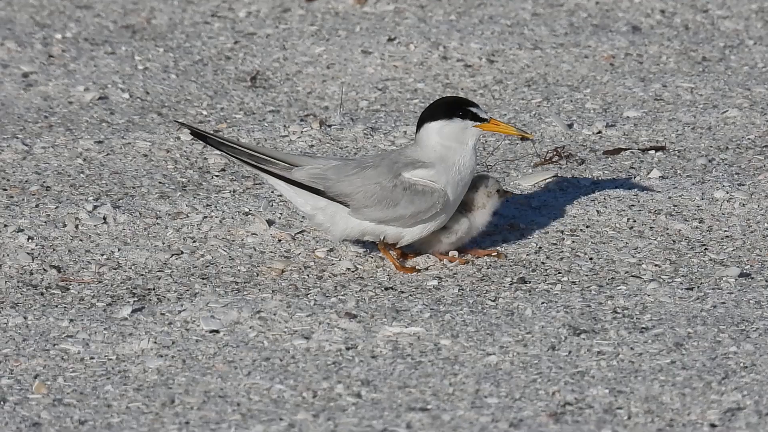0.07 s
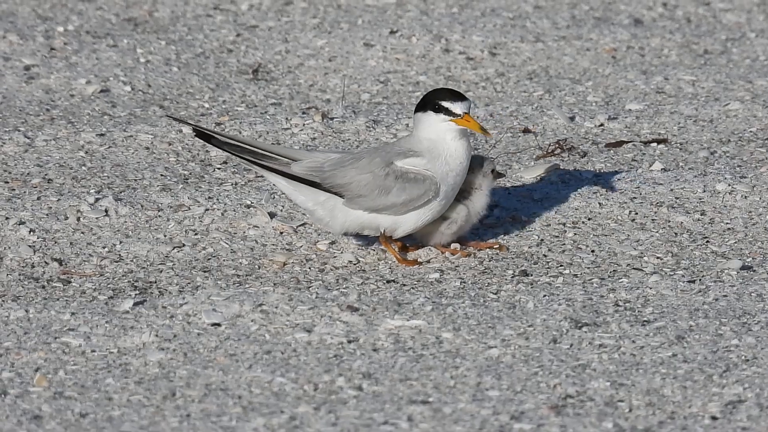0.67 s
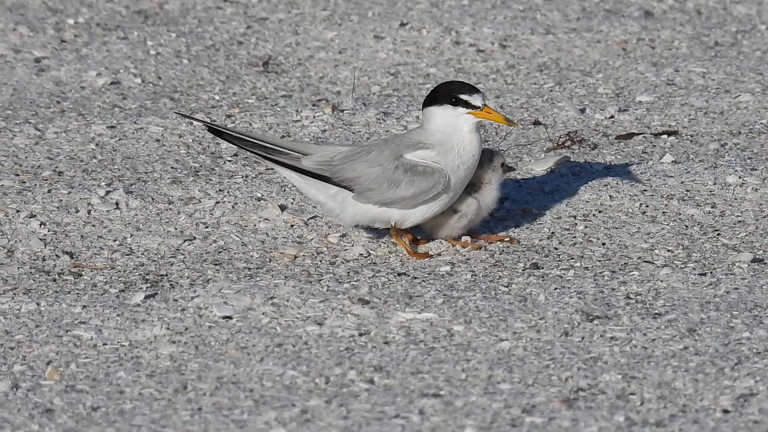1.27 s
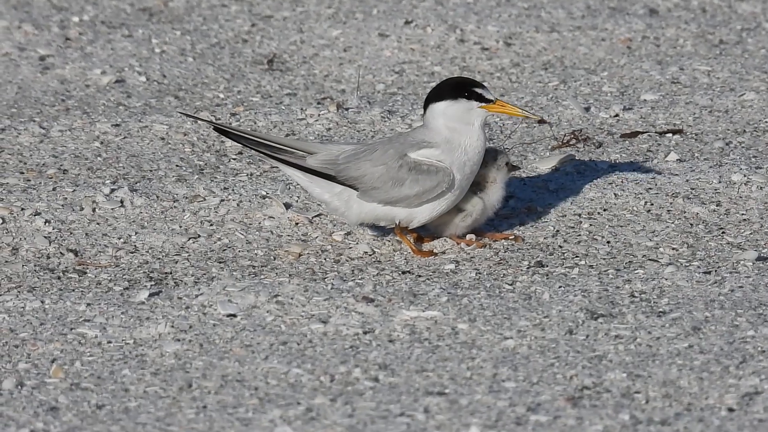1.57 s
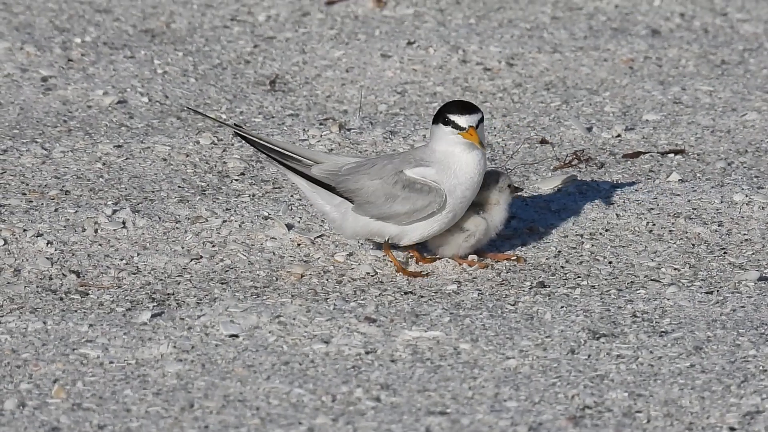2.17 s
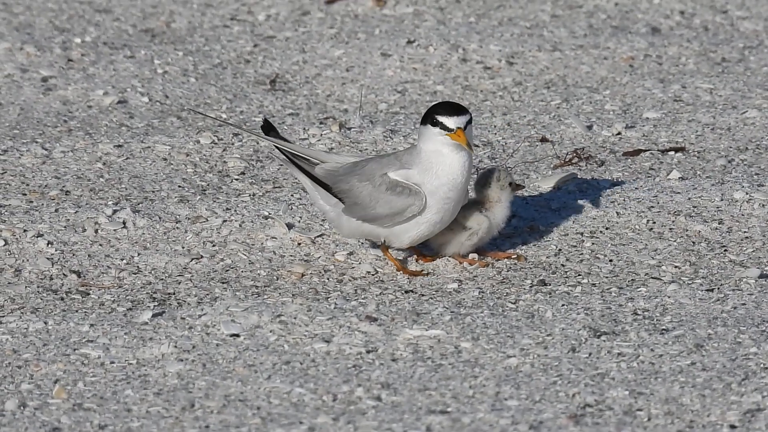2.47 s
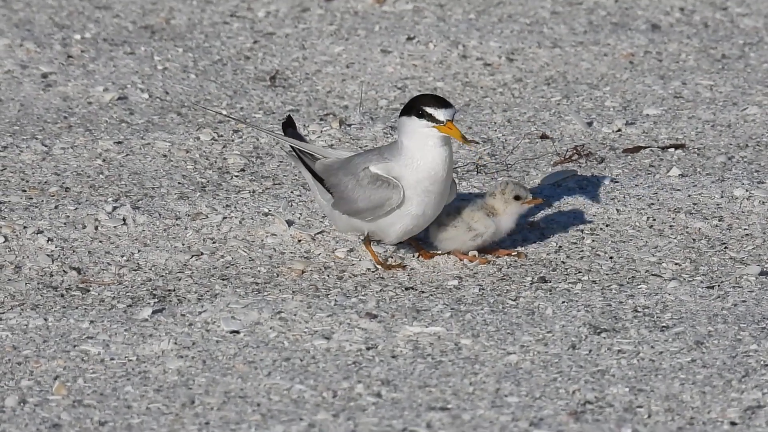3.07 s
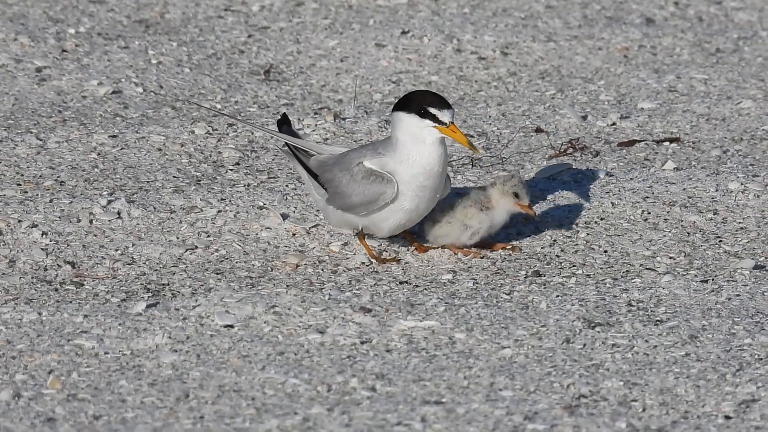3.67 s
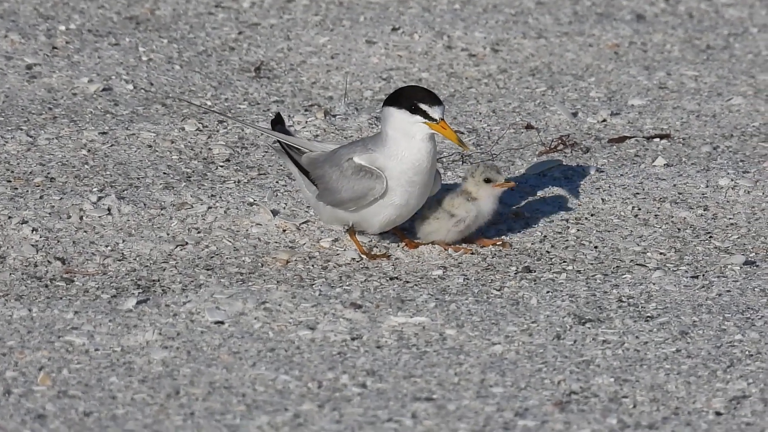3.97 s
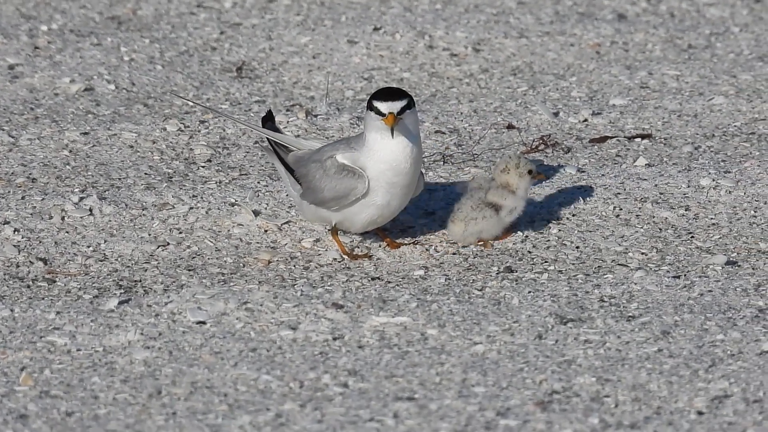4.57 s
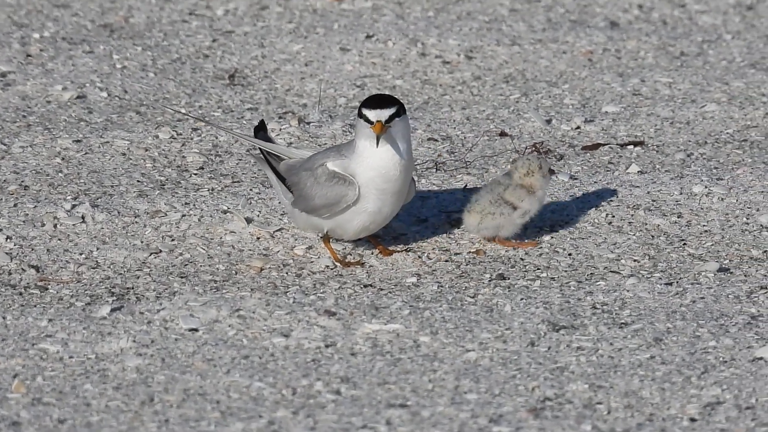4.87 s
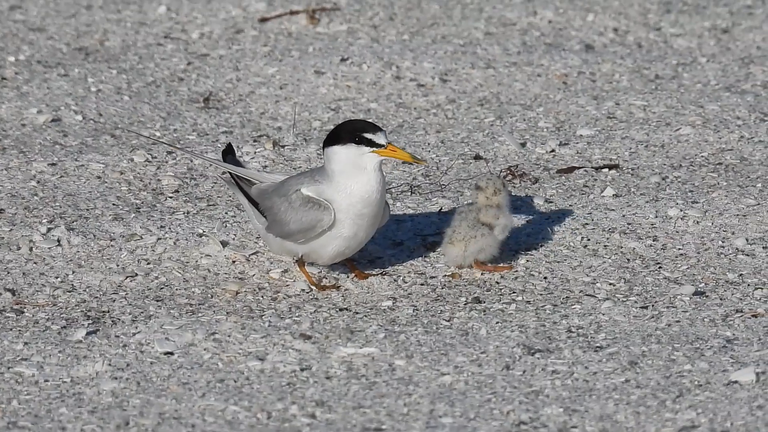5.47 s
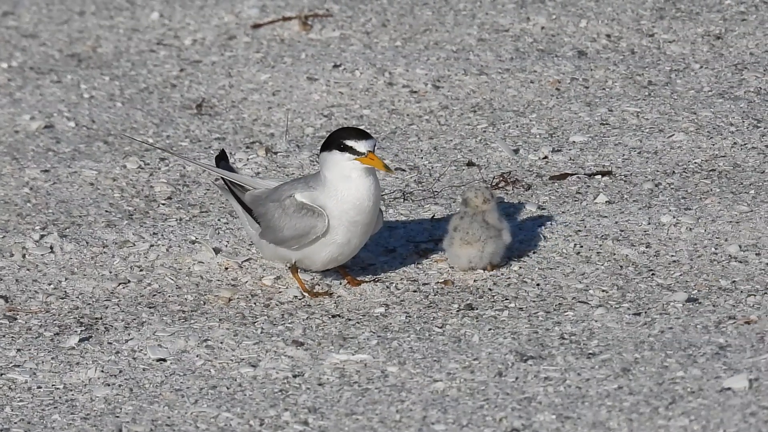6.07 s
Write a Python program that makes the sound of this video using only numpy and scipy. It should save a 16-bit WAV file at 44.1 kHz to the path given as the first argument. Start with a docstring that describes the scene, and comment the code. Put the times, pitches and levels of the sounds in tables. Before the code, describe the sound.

Distant surf makes a steady rush along a beach while uneven gusts rumble against the microphone, with a few deep thuds on the left. Terns call intermittently from slightly to the right: faint high chirps at first, then a few thin, reedy squeals and raspy two-part whistles that slide downward. The wind eases after the first half, and the surf and calls grow a little louder.

```python
"""A breezy beach with nesting terns. Swirls of wind (eddies) thump the two microphone ports of a
camera, each port on its own. Behind them lies the even wash of surf, which drops abruptly after some
hard buffets and creeps back. Some way off, terns give squeaky whistled calls: short "kips", longer
falling slurs and reedy squeals, over the faint chatter of the far colony."""
import sys
import numpy as np
from scipy import signal
from scipy.fft import rfft, irfft
from scipy.io import wavfile
from scipy.ndimage import uniform_filter1d

SR = 44100
rng = np.random.default_rng(int(sys.argv[2]) if len(sys.argv) > 2 else 0)


def digitize_waveform(pressure):
    """Quantize a signal to 16-bit integers and store it at the path in sys.argv[1].

    Rows of a 2-D input are taken as channels; values are limited to [-1, 1].
    """
    field = np.atleast_2d(pressure).T
    bounded = np.clip(field, -1, 1)
    quanta = np.round(bounded * 32767).astype(np.int16)
    wavfile.write(sys.argv[1], SR, quanta)


N = 279594
TIME = np.arange(N) / SR
KIP_RASP = 0.47  # 0 is a pure whistle, 1 is hoarse

# Thuds after which the surf dips: start_s, relative_level_db, dip_db
THUDS = [(0.232, -32, 6.5), (0.403, -39, 8), (2.791, -27, 6.5), (3.669, -29.5, 7.5)]


def gain_of(db):
    """Turns decibels into a number to multiply by."""
    return 10 ** (np.asarray(db) / 20)


def unit_level(x):
    """Scales a signal so that its average power is 1."""
    return x / np.sqrt(np.mean(x ** 2) + 1e-20)


def over_pitch(rows, hz):
    """Looks up a table at the given frequencies, with octaves evenly spaced."""
    row_hz, values = np.transpose(rows)
    return np.interp(np.log(hz + 1), np.log(row_hz), values)


def over_time(rows):
    """Joins a table's rows with straight lines: one curve for each column after the time."""
    time_s, *columns = np.transpose(rows)
    return [np.interp(TIME, time_s, column) for column in columns]


def add(mix, start_s, sound):
    """Mixes a sound in at the given time."""
    part = mix[max(round(start_s * SR), 0):][:len(sound)]
    part += sound[:len(part)]


def wander(rate_hz):
    """Smooth random motion, up to about the given rate."""
    hz = np.fft.rfftfreq(N, 1 / SR)
    return unit_level(irfft(rfft(rng.standard_normal(N)) * np.exp(-(hz / rate_hz) ** 2), N))


def progress(length_s):
    """Runs from 0 to 1 over a note."""
    return np.linspace(0, 1, max(int(length_s * SR), 64))


def eddy(hz, phase_turns, decay_cycles=0.34):
    """One swirl of air passing a port: the pressure swings for about two cycles."""
    t = np.arange(1400) / SR
    age = t * hz / decay_cycles
    return (age / 2) ** 2 * np.exp(2 - age) * np.cos(2 * np.pi * (hz * t + phase_turns))


def flutter(level_db, eddies_per_s=1000, pitch_spread=.26, scatter_db=2.5, shed_hz=40, clump_hz=50):
    """A stream of eddies of many sizes; broken flow sheds them in uneven bursts with gaps between."""
    # How lumpy the air flow is: time_s, burst_depth_db, typical_pitch_hz
    air_flow = [(0.35, 4, 289.9), (0.55, 1.1, 352), (1.7, 2, 352.1), (1.95, 9.5, 298), (2.6, 2.5, 323.3),
                (3.0, 11, 299.8), (6.3, 7.5, 284.9)]
    depth_db, typical_hz = over_time(air_flow)
    turns = np.cumsum(shed_hz * np.exp(.65 * wander(shed_hz))) / SR
    bursts = 0.99 * (2 * np.cos(np.pi * turns) ** 4 - 1)
    bursts += .65 * np.clip(wander(clump_hz), -2, 1.3)
    kicks = (rng.random(N) < eddies_per_s / SR) * rng.choice([-1, 1], N)
    kicks = kicks * gain_of(scatter_db * rng.standard_normal(N) + depth_db * bursts)
    pitches_hz = np.geomspace(170, 900, 28)  # each kick sets off an eddy at one of these
    chosen = np.searchsorted(pitches_hz[:-1], typical_hz * np.exp(pitch_spread * rng.standard_normal(N)))
    flow = sum(signal.oaconvolve(kicks * (chosen == k), eddy(hz, rng.random()))[:N]
               for k, hz in enumerate(pitches_hz))
    strength = np.sqrt(abs(uniform_filter1d(flow ** 2, size=6000)) + 1e-9)
    return flow / strength * gain_of(level_db)


def wind(buffet_boost_db=2.5, shed_pitch_ratio=2.22, low_cut_hz=163, rumble_db=-50):
    """Flutter and single hard buffets at each port, thinned in the bass by the camera's wind filter."""
    # Wind strength at each port, before the filter: time_s, left_db, right_db
    breeze = [(0.15, -13, -20), (0.3, -15.5, -27.5), (0.48, -17.5, -33), (0.9, -19.5, -42.5),
              (1.55, -17, -40), (1.8, -20, -24.5), (2.05, -29.5, -28.5), (2.38, -26, -27),
              (2.48, -19, -28.5), (2.77, -14.5, -26.5), (2.82, -29.5, -28), (3.27, -26, -30.5),
              (3.75, -29, -30), (4.5, -32.5, -28.5), (4.85, -24, -26), (5.28, -27.5, -30.5),
              (5.7, -25, -26), (6.3, -26.5, -26)]
    # The hardest eddies, each shedding a smaller one:
    # time_s, relative_level_db, pitch_hz, port (0 left, 1 right), shed_db (against the main eddy)
    buffets = [(0.146, -9.5, 297.2, 0, -26), (0.223, -2, 267, 0, -26), (0.344, -4, 373, 0, -21),
               (0.428, -9.5, 406, 0, -24), (0.484, -7, 400, 0, -15), (0.63, -9, 290, 0, -10),
               (0.744, -13, 400, 0, -17), (1.058, -7.5, 480, 0, -21), (1.366, -12.5, 370, 0, -12),
               (1.446, -10.5, 371, 0, -10), (1.535, -5.5, 397, 0, -18), (1.556, -13, 537, 0, -19),
               (1.948, -14.5, 325, 0, -18), (1.995, -3.5, 342, 1, -16), (2.039, -14.5, 342, 1, -12),
               (2.132, -11.5, 400, 1, -16), (2.26, -8.5, 432, 1, -10.5), (2.289, -8, 262, 0, -21),
               (2.365, -12, 349, 0, -16), (2.387, -9.5, 335, 1, -2.5), (2.504, -5, 280, 0, -8),
               (2.641, -5.5, 392, 0, -18), (2.733, -5, 400, 0, -15), (2.782, -6.5, 352, 0, -7),
               (2.981, -12.5, 277, 0, -21), (3.046, -12.5, 306, 0, -19), (3.216, -4, 400, 0, -25),
               (3.282, -10, 417, 0, -14), (3.318, -12, 374, 0, -19), (3.344, -14, 300, 0, -24),
               (3.581, -8.5, 310, 0, -18), (3.658, -3.5, 350, 0, -5.5), (3.768, -16.5, 490, 0, -6.5),
               (3.775, -12, 357, 0, -20), (3.853, -11, 264, 0, -9), (3.9, -14.5, 406, 1, -23),
               (3.995, -15, 576, 1, -15), (4.217, -11.5, 298, 1, -12), (4.454, -10, 315, 1, -19),
               (4.671, -7, 366, 1, -5), (4.798, -8, 320, 0, -18), (4.85, -12.5, 480, 1, -13),
               (4.879, -11, 380, 1, -11), (4.919, -8, 525, 1, -12), (4.949, -13, 407, 1, -16),
               (4.965, -12, 433, 1, -10), (5.011, -10, 343, 1, -21), (5.087, -4.5, 340, 1, -10),
               (5.126, -8, 242, 0, -12), (5.375, -7.5, 280, 0, -22), (5.423, -10, 322, 0, -26),
               (5.45, -11, 384, 1, -20), (5.555, -8, 314, 1, -6), (5.585, -5.5, 248, 1, -7),
               (5.638, -10, 475, 1, -22), (5.699, -11, 350, 0, -22), (5.787, -10.5, 333, 1, -16),
               (5.801, -12, 288, 0, -20), (6.065, -9.5, 300, 0, -20), (6.113, -7.5, 296, 0, -29),
               (6.145, -9.5, 350, 1, -16), (6.177, -6.5, 306, 1, -14), (6.275, -12.5, 513, 1, -16),
               (6.316, -7, 244, 0, -20)]
    ports = np.array([flutter(level_db) for level_db in over_time(breeze)])
    for (time_s, db, hz, port, shed_db), phase in zip(buffets, rng.random(len(buffets))):
        swing = eddy(hz, phase) + gain_of(shed_db) * eddy(hz * shed_pitch_ratio, phase)
        add(ports[port], time_s - .5 / hz, gain_of(db + buffet_boost_db) * swing)
    add(ports[0], start_s=3.658, sound=gain_of(-15) * eddy(1650, 0))  # one hard eddy cracks on the left
    wind_filter = signal.butter(3, low_cut_hz, "highpass", fs=SR, output="sos")
    return signal.sosfilt(wind_filter, ports) + gain_of(rumble_db) * ports


def surf_level(fall_s=0.0037, recovery_s=2.26):
    """The surf's relative level in dB: a slow swell that dips at each thud and creeps back."""
    # Slow swell of the surf: time_s, relative_level_db
    swell = [(0.12, -50.5), (0.9, -48), (1.8, -49.5), (2.45, -47), (2.8, -50.5), (3.7, -49.5), (4.4, -46.5),
             (6.33, -44.5)]
    level_db = over_time(swell)[0]
    for start_s, _, dip_db in THUDS:
        since_s = np.maximum(TIME - start_s, 0)
        level_db -= dip_db * np.minimum(since_s / fall_s, 1) * np.exp(-since_s / recovery_s)
    return level_db


def surf(boost_db=19.0, patch_db=2.0, roar_growth=0.072, roar_hz=2600):
    """Far breakers: a wide wash of noise with drifting patches; its roar grows faster than its fizz."""
    # Tone colour of the surf: pitch_hz, relative_level_db
    colour = [(25, -44), (60, -48), (120, 6), (750, 1.5), (1150, 1.5), (1850, -3), (2350, -10),
              (3000, -11.5), (3600, -15), (4400, -12), (5000, -19.5), (5800, -14.5), (6700, -21),
              (7600, -22.5), (8600, -28), (9800, -28.5), (12000, -36), (14000, -50)]
    # How alike the surf is at the two ports: pitch_hz, likeness (1 the same, -1 opposite)
    port_likeness = [(300, 0.53), (1000, 0.9), (1900, 0.69), (2500, 0.36), (3300, 0.08), (4400, -0.74),
                     (5800, 0.44), (6600, -0.49), (9800, -0.48), (10700, -0.035), (12500, 0.24),
                     (14000, -.7)]
    frames, hz = N // 256 + 5, np.fft.rfftfreq(1024, 1 / SR)  # the noise is a grid of pitch by time
    a, b, c, d, patches = rng.standard_normal((frames, len(hz), 5)).T
    patches = unit_level(uniform_filter1d(uniform_filter1d(patches, size=5, axis=0), size=12, axis=1))
    likeness = np.clip(over_pitch(port_likeness, hz), -1, 1)[:, None]
    left = a + 1j * b
    right = likeness * left + np.sqrt(1 - likeness ** 2) * (c + 1j * d)
    swell_db = surf_level()
    heave_db = np.interp(np.arange(frames) * 256, np.arange(N), swell_db - swell_db.mean())
    roar_db = roar_growth * np.outer(np.exp(-(hz / roar_hz) ** 2), heave_db)
    shape = gain_of(over_pitch(colour, hz)[:, None] + patch_db * patches + roar_db)
    wash = signal.istft(np.array([left, right]) * shape, nperseg=1024, noverlap=768)[1][:, :N]
    return unit_level(wash) * gain_of(swell_db + boost_db) * gain_of([[-.8], [.8]])


def tern_voice(pitch_hz, rasp, gap_hz=290, lower_db=8, octave_db=-14, jitter=0.021, quaver_hz=73.6):
    """A fluttering whistle. Rasp shakes it and adds an overtone and a lower voice that beats with it."""
    t = TIME[:len(pitch_hz)]
    smoothing = signal.butter(2, 400, fs=SR, output="sos")
    shake, waver = rasp * unit_level(signal.sosfilt(smoothing, rng.standard_normal((2, len(t)))))
    strain = np.exp(-((1 - pitch_hz / pitch_hz.max()) / 0.041) ** 2)  # only near the top pitch
    phase = 2 * np.pi * np.cumsum(pitch_hz * (1 + jitter * shake)) / SR
    lower_turns = np.cumsum(pitch_hz * (1 + jitter * waver) - gap_hz) / SR + rng.random()
    lower = rasp ** 2 * gain_of(lower_db) * np.sin(2 * np.pi * lower_turns)
    overtone = rasp * gain_of(octave_db) * np.sin(2 * phase)
    voice = np.sin(phase) + strain * (lower + overtone)
    quaver = 1 + 0.25 * np.sin(2 * np.pi * (quaver_hz * t + rng.random()))
    return unit_level(voice * quaver * gain_of(2.5 * waver)) * signal.windows.tukey(len(t), 0.3)


def colony(low_hz=2600, high_hz=3850, note_s=0.06, fall=0.04, count=220):
    """Distant terns, faint in the surf: short falling notes from all sides, most of them low."""
    # Chatter of the colony, added to the surf's swell: time_s, relative_level_db
    chatter = [(0.2, 3), (1.0, -0.5), (2.2, -2), (3.2, -10), (4.7, -7), (5.6, -1)]
    out = np.zeros((2, N))
    for when, height, side, size in rng.random((count, 4)):
        hz = low_hz + height ** 2 * (high_hz - low_hz)
        note = size * tern_voice(hz * (1 - fall * progress(note_s) ** 2), rasp=0.55)
        add(out[0], when * N / SR, np.sqrt(1 - side) * note)
        add(out[1], when * N / SR, np.sqrt(side) * note)
    return out * gain_of(surf_level() + over_time(chatter)[0])


def scratch(hz, strength, length_s=.02, buzz_hz=850, squeak_db=-7):
    """A note's ragged start: the voice buzzes up to pitch while a thin squeak shoots above it."""
    u = progress(length_s)
    voice = tern_voice(hz * (.92 + .08 * u), rasp=0.79)
    buzz = 1 + 1.1 * np.sin(2 * np.pi * (buzz_hz * length_s * u + rng.random()))
    squeak = tern_voice(hz * (1 + .5 * u ** 2), rasp=0.79)
    return strength * gain_of(-2) * (voice * buzz + gain_of(squeak_db) * squeak)


def kip(length_s, hz, arch=0.27, top_at=0.418, swell_db=7):
    """A short, raspy note that rises and falls in pitch and is loudest in its middle."""
    u = progress(length_s)
    voice = tern_voice(hz * (1 - arch * (u - top_at) ** 2), KIP_RASP)
    return voice * gain_of(swell_db * (np.sin(np.pi * u) - 0.82))


def thuds(thud_hz=75, thud_db=-1, snap_db=-9, snap_decay_s=0.00065):
    """Deep thuds on the left, each with a tiny bright snap on top."""
    out, t = np.zeros((2, N)), TIME[:400]
    thud = eddy(thud_hz, 0) * np.linspace(1, 0, 1400)
    for start_s, db, _ in THUDS:
        snap = rng.standard_normal(len(t)) * np.exp(-t / snap_decay_s)
        add(out[0], start_s - 1 / thud_hz, gain_of(db + thud_db) * thud)
        add(out[0], start_s, gain_of(db + snap_db) * snap)
    return out


def squeal(base_hz, length_s=0.07, fall=0.11, wobble_hz=32):
    """A far, reedy cry: a few overtones that waver and fall together."""
    # Overtones of a squeal: pitch_multiple, relative_level_db
    overtones = [(3, -5), (4, -1.5), (5, -4)]
    u = progress(length_s)
    wobble = 0.014 * np.sin(2 * np.pi * (wobble_hz * length_s * u + rng.random()))
    pitch_hz = base_hz * (1 - fall * u + wobble)
    return sum(gain_of(db) * tern_voice(multiple * pitch_hz, rasp=.3) for multiple, db in overtones)


def slur(length_s, hz, fall, rasp, swell_db=4, scoop_s=0.0088, catch_s=.0022):
    """A longer note that scoops up, swells as it slides down, catches twice and lifts at the end."""
    # Where the voice catches: share_of_length (0 to 1)
    catch_points = [.56, .74]
    u = progress(length_s)
    scoop = 0.0535 * np.exp(-u * length_s / scoop_s)
    slide = (1 + np.tanh(5.2 * (u - 0.5))) / 2
    lift = 0.0336 * u ** 2
    catches = sum(np.exp(-((u - at) * length_s / catch_s) ** 2) for at in catch_points)
    level_db = swell_db * (np.sin(np.pi * u) - .5) - 36 * rasp * catches
    return tern_voice(hz * (1 - fall * slide - scoop + lift), rasp) * gain_of(level_db)


def terns(opening_db=-4.5, opening_s=0.033, scratch_lead_s=0.007, echo_db=-15, echo_s=0.39):
    """The terns' calls, slightly to the right, with a faint echo scattered from the beach."""
    # Calls of a kip, then a slur:
    # start_s, slur_delay_s, slur_length_s, pitch_hz, fall (share of pitch), rasp (0 to 1), level_db
    two_part_calls = [(2.841, 0.042, 0.092, 4065, 0.14, 0.5, -41.5),
                      (4.152, 0.042, 0.076, 3930, 0.13, 0.4, -44.5),
                      (5.159, 0.054, 0.099, 3690, 0.088, 0.03, -39.5),
                      (6.072, 0.062, 0.076, 3710, 0.11, 0.23, -34.5)]
    # Kips on their own: start_s, length_s, pitch_hz, level_db
    lone_kips = [(0.18, 0.045, 3760, -53), (1.77, 0.036, 4070, -50), (1.815, 0.045, 3930, -46),
                 (0.41, 0.058, 3700, -61), (2.045, 0.05, 3630, -54), (2.325, 0.028, 4250, -58),
                 (4.239, 0.061, 3880, -46), (5.31, 0.028, 3780, -47), (5.772, 0.055, 3430, -52),
                 (5.843, 0.033, 4000, -43.5), (5.889, 0.045, 3820, -38), (6.217, 0.034, 3980, -45.5)]
    # Far squeals: start_s, base_pitch_hz, level_db
    squeals = [(2.402, 1126, -53), (2.984, 1100, -57.5), (3.348, 1145, -56)]
    calls = np.zeros(N)
    for start_s, delay_s, length_s, hz, fall, rasp, db in two_part_calls:
        add(calls, start_s - scratch_lead_s, gain_of(db + opening_db) * scratch(hz, rasp))
        add(calls, start_s, gain_of(db + opening_db) * kip(opening_s, hz))
        add(calls, start_s + delay_s - scratch_lead_s, gain_of(db) * scratch(hz, rasp))
        add(calls, start_s + delay_s, gain_of(db) * slur(length_s, hz, fall, rasp))
    for start_s, length_s, hz, db in lone_kips:
        add(calls, start_s - scratch_lead_s, gain_of(db) * scratch(hz, KIP_RASP))
        add(calls, start_s, gain_of(db) * kip(length_s, hz))
    for start_s, hz, db in squeals:
        add(calls, start_s, gain_of(db) * squeal(hz))
    t = TIME[:SR // 2]
    tail = rng.standard_normal((2, len(t))) * gain_of(-60 * t / echo_s)
    echo = signal.fftconvolve(calls[None], tail / np.linalg.norm(tail[0]), axes=1)[:, :N]
    direct = np.array([np.concatenate([[0], calls[:-1]]), calls])  # reaches the left port a sample later
    return direct * gain_of([[-.8], [.8]]) + gain_of(echo_db) * echo


def scene():
    """Wind on the microphone, surf and birds, in stereo."""
    return wind() + surf() + thuds() + terns() + colony()


def record(dry, fade_middle_s=.106, fade_s=0.028, ceiling=.97, high_cut_hz=15700):
    """Fades in quickly, rounds off the tallest peaks and removes the highest treble."""
    faded = dry * np.clip((TIME - fade_middle_s) / fade_s + .5, 0, 1) ** 2
    rounded = faded / (1 + (faded / ceiling) ** 6) ** (1 / 6)
    treble_cut = signal.firwin(511, high_cut_hz, window=("kaiser", 9), fs=SR)
    return signal.oaconvolve(rounded, treble_cut[None], "same")


dry = scene()
out = record(dry)
digitize_waveform(out)
```